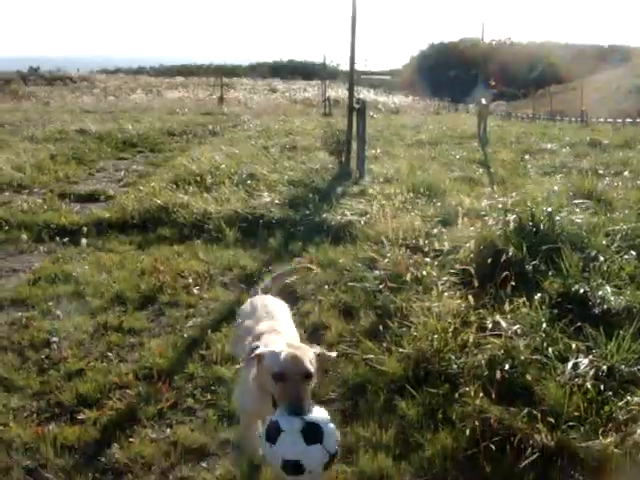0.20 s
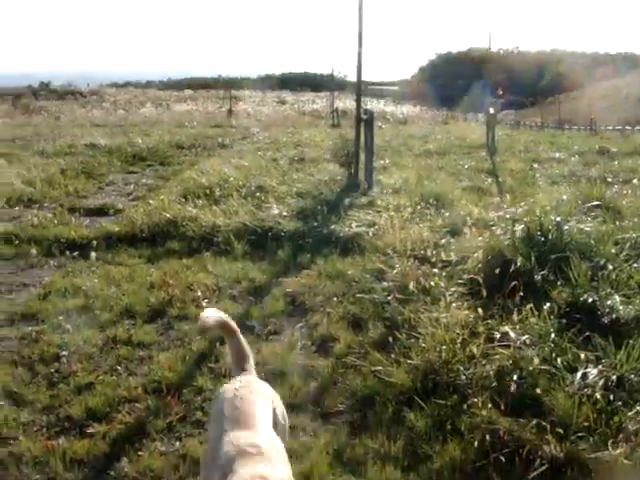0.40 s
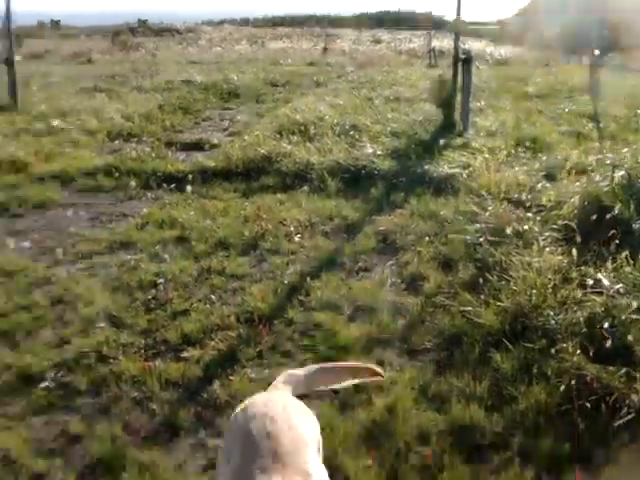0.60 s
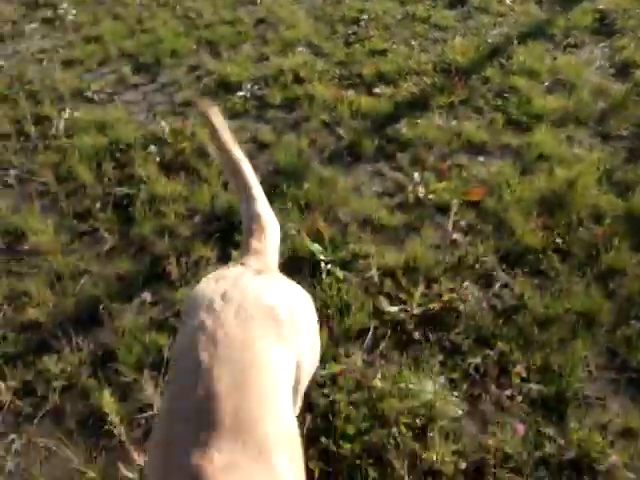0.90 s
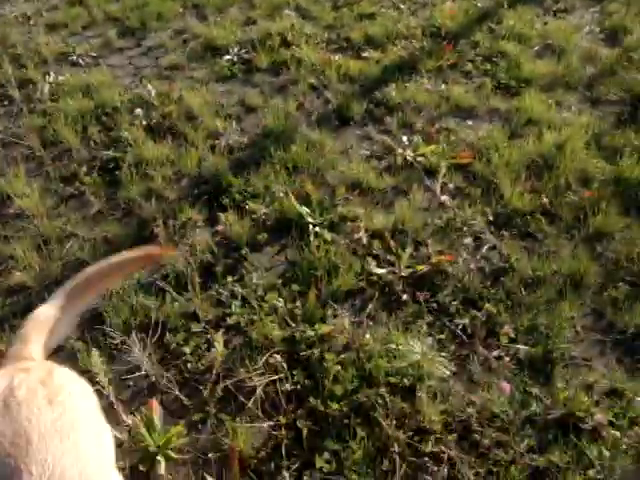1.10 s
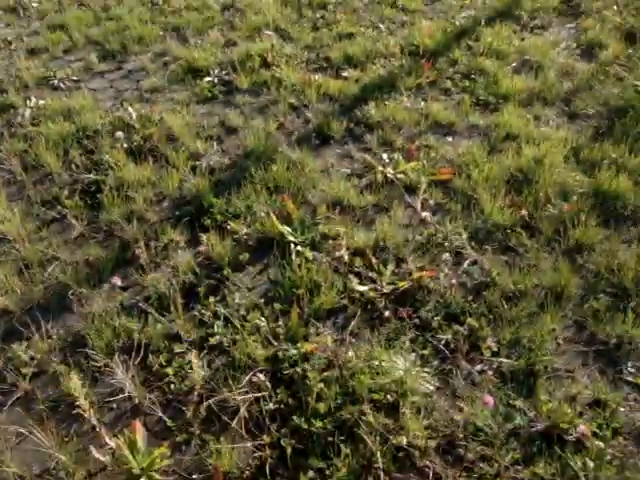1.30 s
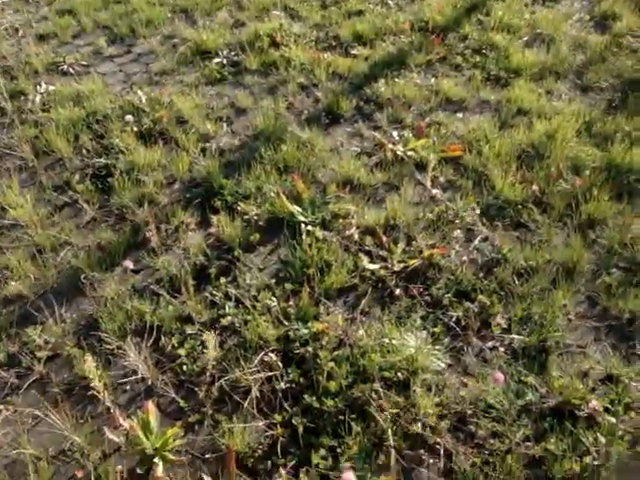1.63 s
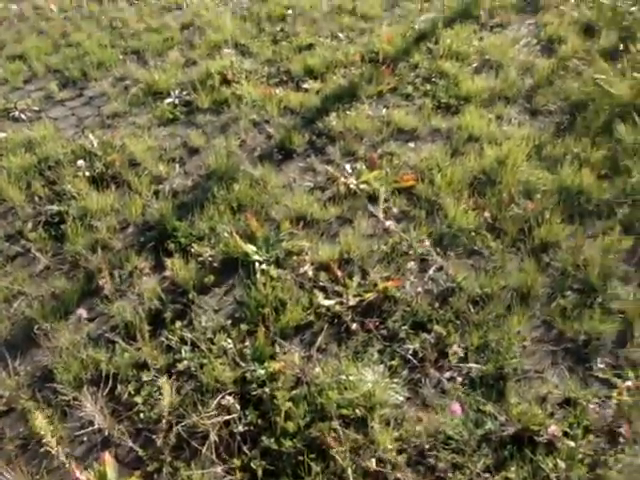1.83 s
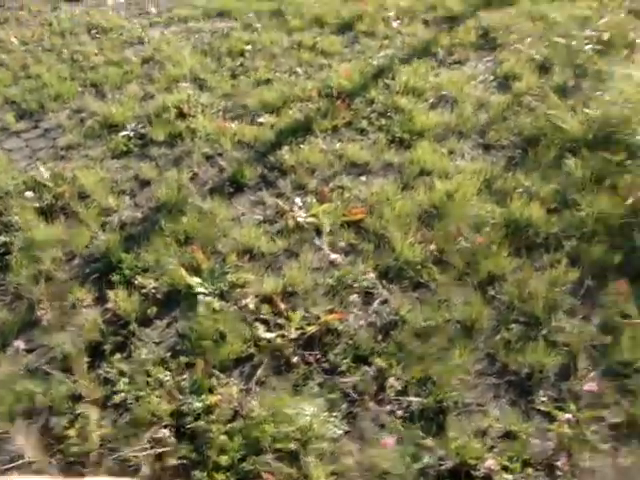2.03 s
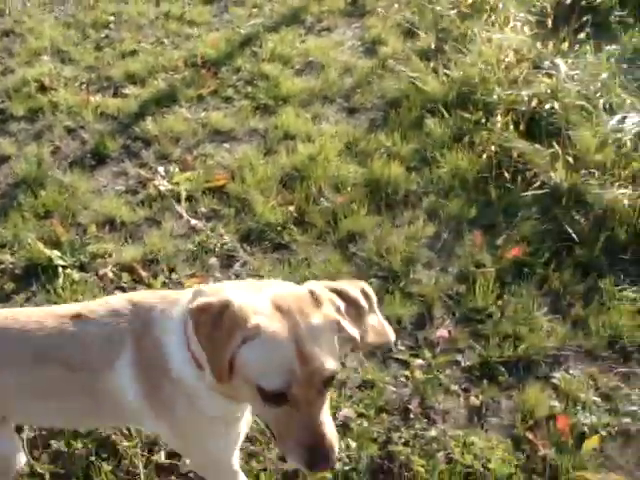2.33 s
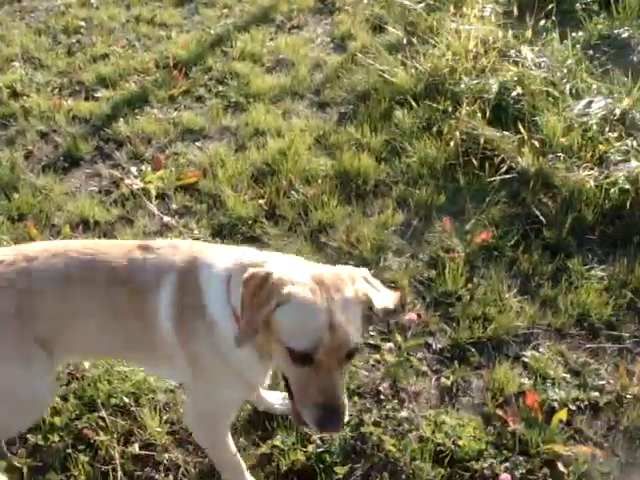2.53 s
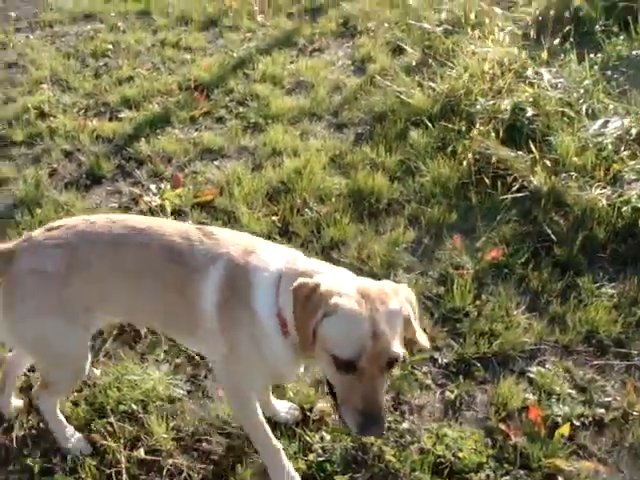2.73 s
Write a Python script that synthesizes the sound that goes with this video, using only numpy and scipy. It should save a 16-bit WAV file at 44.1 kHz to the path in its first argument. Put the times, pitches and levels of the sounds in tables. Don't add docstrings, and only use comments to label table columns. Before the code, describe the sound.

A dog trots up panting, quick breaths out and in growing louder, with a loud snort, gasps and breath gusts buffeting the very close handheld microphone, then easing; soft breeze and crackling grass outdoors.

```python
import sys
import numpy as np
from scipy import signal
from scipy.fft import rfft, irfft
from scipy.io import wavfile
from scipy.ndimage import uniform_filter1d

SR = 44100
rng = np.random.default_rng(int(sys.argv[2]) if len(sys.argv) > 2 else 0)


def unload_audio(sound):
    columns = np.transpose(np.atleast_2d(sound))
    steps = np.round(np.clip(columns, -1, 1) * 32767)
    wavfile.write(sys.argv[1], SR, steps.astype(np.int16))


def boost_factor(decibels):
    exponent = np.asarray(decibels, float) / 20
    return 10 ** exponent


N = 125685


def evened(x):
    return x / np.sqrt(np.mean(x ** 2) + 1e-20)


def add(mix, s, sound):
    at = round(s * SR)
    part = mix[max(at, 0):][:len(sound) + min(at, 0)]
    part += sound[max(-at, 0):][:len(part)]


def coloured(size, points):
    f, db = np.transpose(points)
    hz = np.fft.rfftfreq(size, 1 / SR) + 1
    gain = boost_factor(np.interp(np.log(hz), np.log(f), db, -80, -80))
    return evened(irfft(rfft(rng.standard_normal(size)) * gain, size))


def slow(size, top_hz):
    hz = np.fft.rfftfreq(size, 1 / SR)
    gain = (hz > 0) / (1 + (hz / top_hz) ** 4)
    return evened(irfft(rfft(rng.standard_normal(size)) * gain, size))


def resonate(x, hz, width):
    turn = np.exp(2j * np.pi * np.cumsum(hz) / SR)
    r = np.exp(-np.pi * width * 1.5 / SR)
    return 2 * (turn * signal.lfilter([(1 - r) ** 2], [1, -2 * r, r * r], x / turn)).real


def swell(t, length, rise_s, fall_s):
    return np.sin(np.pi / 2 * np.clip(np.minimum(t / rise_s, (length - t) / fall_s), 0, 1)) ** 2


def swing(s, db, hz, half_s, phase):
    t = np.arange(-.02, .02, 1 / SR)
    return s - .02, boost_factor(db) * np.exp(-(t / half_s) ** 2) * np.cos(2 * np.pi * hz * t + phase)


# start_s, length_s, effort_db, tract_pitch_factor, mouth_brightness_db
BREATHS_OUT = [
    (0.178, 0.19, -30.5, 0.98, 0),
    (0.611, 0.19, -25, 0.96, 1.5),
    (1.578, 0.19, -22.5, 0.96, -5),
    (2.828, 0.09, -32, 1, 4.5),
]
# start_s, length_s, effort_db, tract_pitch_factor, mouth_brightness_db
FORCED_BREATHS = [
    (1.044, 0.15, -21, 0.99, -1.5),
    (1.972, 0.17, -27.5, .94, 0),
    (2.365, 0.13, -27, 0.99, 7.5),
]
# start_s, length_s, effort_db, tract_pitch_factor, mouth_brightness_db
GASPS = [
    (1.365, 0.12, -22, 0.992, -2),
    (.848, 0.072, -27.5, 1.094, 1.5),
]
# start_s, length_s, effort_db, tract_pitch_factor, mouth_brightness_db
BREATHS_IN = [(-.02, 0.16, -37.5, 1.09, 8.5), (0.371, 0.14, -28.5, 1.08, 2),
              (0.469, 0.14, -35.5, 0.97, 10.5), (0.807, 0.069, -24, 1.2, -0.5),
              (0.94, 0.1, -24, 0.94, -6.5), (1.242, 0.17, -23, 1, -6.5), (1.476, 0.09, -33, 0.89, 6.5),
              (1.756, 0.088, -22.5, 0.88, -17), (1.849, 0.099, -22.5, 0.93, -15),
              (2.169, 0.045, -28, 1.17, 3.5), (2.24, 0.053, -41, 0.66, 1), (2.464, 0.063, -31.5, 1.2, 6),
              (2.545, 0.064, -30.5, 1.33, 7.5), (2.674, 0.13, -38.5, 1.34, 1.5)]
# band_hz, width_hz, level_db
OUT_TRACT = [(564, 93, -2.5), (1026, 196, -2), (1445, 118, -7), (1945, 67, -5), (2454, 39, -8.5),
             (2943, 440, -13), (3593, 46, -9), (4370, 50, -57), (6320, 160, -21.5)]
# band_hz, width_hz, level_db
NEAR_TRACT = [(650, 103, -5.5), (1027, 120, 0), (1372, 93, -6), (1693, 91, -8), (2107, 110, -9.5),
              (2794, 180, -8), (3620, 39, -7), (4110, 200, -14.5), (6470, 170, -23)]
# band_hz, width_hz, level_db
AWAY_TRACT = [(530, 85, -10), (990, 210, 0.5), (1300, 120, -1), (1650, 220, -10), (2070, 200, -12.5),
              (2700, 340, -10), (3110, 170, -10), (4800, 300, -24), (6270, 280, -21)]
# band_hz, width_hz, level_db
IN_TRACT = [(615, 143, 6.5), (974, 170, 5), (1233, 56, 2.5), (1780, 120, -12), (2320, 400, -3.5),
            (3110, 296, -5), (3760, 470, -11), (4870, 300, -18.5), (6050, 140, -14), (7000, 150, -16)]
# band_hz, width_hz, level_db
GASP_PINCH = (3270, 520, 0)


def panting():
    out = np.zeros(N)
    for s, *row in BREATHS_OUT:
        add(out, s, breath(*row, OUT_TRACT, rise_s=0.019, fall_s=0.12, sag_db=1.5))
    for (s, *row), tract in zip(FORCED_BREATHS, (NEAR_TRACT, OUT_TRACT, AWAY_TRACT)):
        add(out, s, breath(*row, tract, rise_s=0.013, fall_s=0.039, sag_db=1.5))
    for s, *row in GASPS:
        add(out, s, breath(*row, [*IN_TRACT, GASP_PINCH], rise_s=0.015, fall_s=0.034, sag_db=6.8))
    for s, *row in BREATHS_IN:
        add(out, s, breath(*row, IN_TRACT, rise_s=0.028, fall_s=0.03, sag_db=-7))
    return out


# frequency_hz, level_db (per Hz)
TEETH_HISS = [(290, -59), (500, -1), (696, -22), (922, 0.5), (1750, -5.5), (3050, -7), (9480, -14),
              (10500, -25.5), (13600, -50)]
HISS_DB, MOUTH_HZ = -6.5, 1600
FLUTTER_HZ, FLUTTER_DB, OWN_FLUTTER_DB = 73, 1.5, 1.7
SPITTLE_PER_S, SPITTLE_DB = 150, 19


def breath(length, effort_db, factor, bright_db, tract, rise_s, fall_s, sag_db):
    size = 10000
    t = np.arange(size) / SR
    spittle = rng.random(size) < SPITTLE_PER_S / SR
    air = rng.standard_normal(size) * (1 + boost_factor(SPITTLE_DB) * spittle)
    wander = 1 + 0.025 * slow(size, 14.5)
    throat, mouth = np.zeros(size), np.zeros(size)
    for k, (hz, width, db) in enumerate(tract):
        in_mouth = hz > MOUTH_HZ
        pitch = hz * wander * (1 if in_mouth else factor)
        flutter = boost_factor(db + OWN_FLUTTER_DB * slow(size, 30))
        ring = (-1) ** k * flutter * resonate(air, pitch, width)
        if in_mouth:
            mouth += ring
        else:
            throat += ring
    hiss = boost_factor(HISS_DB + 3.35 * slow(size, 86)) * coloured(size, TEETH_HISS)
    voiced = (throat + boost_factor(bright_db) * mouth) / np.std(throat)
    sound = voiced * boost_factor(FLUTTER_DB * slow(size, FLUTTER_HZ)) + boost_factor(bright_db) * hiss
    return sound * swell(t, length, rise_s, fall_s) * boost_factor(effort_db + sag_db * t / length)


# start_s, length_s, level_db, first_hz, last_hz
AIR_JETS = [(.19, .14, -37, 702, 576), (1.99, 0.15, -36.5, 1335, 1386), (.545, 0.041, -35.5, 3100, 3400),
            (0.854, 0.061, -31, 2210, 2080), (0.962, 0.043, -39, 3000, 3450),
            (1.114, 0.057, -30, 3630, 3620), (1.175, .02, -30, 3600, 3600),
            (1.276, 0.14, -36.5, 2850, 2780), (1.288, 0.097, -38, 2390, 2350),
            (1.405, 0.078, -23, 3470, 3040), (1.395, 0.084, -30, 950, 910), (1.6, .11, -33, 1510, 1490),
            (1.799, 0.118, -41.5, 2950, 2700), (2.033, 0.09, -37, 2250, 3200),
            (1.3, 0.074, -29, 1150, 1200), (2.555, 0.053, -33, 1240, 1150),
            (2.555, 0.053, -41, 2750, 2940), (2.787, 0.024, -47, 4300, 4300)]
JET_Q, JET_EDGE_S, JET_LUMPS_DB = 16, .012, 3


def jets():
    out, size = np.zeros(N), 8000
    t = np.arange(size) / SR
    for s, length, db, first_hz, last_hz in AIR_JETS:
        hz = first_hz + (last_hz - first_hz) * np.minimum(t / length, 1)
        edge_s = min(JET_EDGE_S, length / 2)
        whistle = evened(resonate(rng.standard_normal(size), hz, first_hz / JET_Q))
        lumps = boost_factor(db + JET_LUMPS_DB * slow(size, 60))
        add(out, s, lumps * swell(t, length, edge_s, edge_s) * whistle)
    return out


# time_s, level_db, pitch_hz
NOSTRIL = [
    (1.25, -61, 7230),
    (1.269, -36.5, 7340),
    (1.421, -34.5, 6070),
    (1.46, -27.5, 6200),
    (1.48, -66, 6000),
]


def nostril_hiss():
    t = np.arange(N) / SR
    s, db, hz = np.transpose(NOSTRIL)
    air = rng.standard_normal(N)
    broken_db = 4.0 * evened(uniform_filter1d(air, size=250))
    return evened(resonate(air, np.interp(t, s, hz), 880)) * boost_factor(np.interp(t, s, db) + broken_db)


# centre_s, peak_db, pitch_hz, length_s
PALATE_SNAPS = [(.024, -24, 2780, .001), (.058, -25, 3100, .001), (0.079, -23, 3200, 0.0012),
                (.44, -17, 1140, 0.0046), (0.627, -11.5, 1040, 0.0016), (0.654, -13, 1053, 0.0043),
                (0.674, -16, 1110, 0.0052), (0.870, -12, 1130, 0.0031), (0.883, -9.5, 1140, 0.0026),
                (0.885, -5.5, 756, 0.0012), (2.243, -21, 1296, 0.00095), (.423, -25, 674, 0.0017),
                (.455, -19, 1060, 0.0028), (.473, -27, 330, 0.0034), (.49, -21.5, 584, 0.0035),
                (.858, -16.5, 2400, 0.0016), (1.399, -5, 900, 0.00058), (1.412, -14.5, 3420, .002),
                (1.429, -8, 900, 0.0017), (1.465, -11.5, 3530, 0.0011), (2.596, -25, 1150, 0.0041)]
# centre_s, peak_db, pitch_hz, length_s
LOUD_CATCH = (.836, -6.5, 1080, .0028)


def palate_catches():
    out = np.zeros(N)
    for s, db, hz, half_s in [*PALATE_SNAPS, LOUD_CATCH]:
        add(out, *swing(s, db, hz, half_s, 0))
        add(out, *swing(s, db - 14.5, 2.64 * hz, half_s / 2, 0))
    return out


# start_s, level_db
TONGUE = [
    (1.865, -12.5),
    (3.9, -22),
    (1.1, -22),
]


def tongue_clicks():
    out, t = np.zeros(N), np.arange(200) / SR
    for s, db in TONGUE:
        add(out, s, boost_factor(db) * rng.standard_normal(200) * np.exp(-t / 0.00035))
    return out


# start_s, length_s, level_db, eddy_pitch_hz
PORT_GUSTS = [(0.327, 0.14, -38, 132), (0.908, 0.016, -24, 180), (0.943, 0.032, -13, 242),
              (0.976, 0.029, -20.5, 222), (1.008, 0.04, -22.5, 214), (1.051, 0.023, -21, 188),
              (1.099, 0.027, -16, 184), (1.126, 0.0423, -12.5, 272), (1.167, 0.033, -17, 239),
              (1.205, 0.032, -18.5, 242), (1.235, 0.042, -13.5, 215), (1.271, 0.08, -19.5, 229),
              (1.335, 0.028, -15, 187), (1.381, 0.13, -31, 155), (1.502, 0.077, -25.5, 204),
              (1.641, 0.053, -18.5, 242), (1.696, 0.021, -24, 250), (1.718, 0.019, -16.5, 185),
              (1.745, 0.04, -14, 347), (1.783, 0.053, -15, 348), (1.835, 0.05, -13, 320),
              (1.883, 0.053, -17, 209), (1.931, 0.046, -18.5, 262), (1.978, 0.029, -15.5, 200),
              (2.007, 0.029, -23.5, 217), (2.13, 0.053, -31.5, 129), (2.29, 0.03, -35, 161)]
# centre_s, peak_db, pitch_hz, length_s
DIAPHRAGM_JOLTS = [(.953, -7, 173, 0.0027), (.977, -13.5, 249, 0.0036), (1.246, -3.5, 243, 0.0033),
                   (1.267, -10.5, 200, 0.00253), (1.296, -5, 233, 0.0015), (1.346, -13.5, 160, 0.0028),
                   (1.3535, -3.5, 174, 0.0034), (1.54, -10, 330, .001), (1.672, -6, 332, .001),
                   (1.7, -8, 330, 0.00088), (1.799, -5, 298, .0015), (1.913, -6, 232, 0.0018)]
SUCTION, JOLT_HUSH_S, PORT_LOW_HZ, PORT_HIGH_HZ = 1, 0.0038, 89.6, 1400


def buffet():
    out, t = np.zeros(N), np.arange(N) / SR
    for s, *row in PORT_GUSTS:
        add(out, s, gust(*row))
    leak = signal.butter(N=4, Wn=PORT_LOW_HZ, btype="high", fs=SR)
    out = signal.lfilter(*leak, out - SUCTION * out ** 2)
    for s, *_ in DIAPHRAGM_JOLTS:
        out = out * (1 - np.exp(-((t - s) / JOLT_HUSH_S) ** 2))
    for row in DIAPHRAGM_JOLTS:
        add(out, *swing(*row, np.pi))
    port = signal.butter(N=2, Wn=[PORT_LOW_HZ / 2, PORT_HIGH_HZ], btype="band", fs=SR, output="sos")
    return signal.sosfiltfilt(port, out)


GUST_EDGE_S, EDDY_Q, EDDY_DRIFT, EDDY_LUMPS_DB, SWIRL_DB = 0.0069, 2.3, 0.11, 2.5, -14


def gust(length, db, hz):
    size = 10000
    t, air = np.arange(size) / SR, rng.standard_normal(size)
    pitch = hz * (1 + EDDY_DRIFT * slow(size, 19.6))
    eddies = resonate(air, pitch, hz / EDDY_Q)
    power = abs(uniform_filter1d(eddies ** 2, size=500))
    eddies = eddies / np.sqrt(power + 0.12 * np.var(eddies))
    swirls = evened(resonate(air, 2.5 * pitch, 333))
    lumps = boost_factor(EDDY_LUMPS_DB * slow(size, 42) - 3 * t / length)
    sound = swell(t, length, GUST_EDGE_S, GUST_EDGE_S) * lumps * (eddies + boost_factor(SWIRL_DB) * swirls)
    return boost_factor(db) * evened(sound[t < length])


# time_s, level_db
GRASS_NEARNESS = [(0.0, -87), (0.15, -43.5), (0.25, -49), (0.58, -42.5), (0.68, -42.5), (0.82, -45.5),
                  (1.13, -38), (1.25, -42.5), (1.31, -41.5), (1.4, -61), (1.49, -35), (1.63, -54.5),
                  (1.88, -38), (2.09, -38.5), (2.5, -41.5), (2.7, -41.5), (2.85, -46.5)]
# frequency_hz, level_db (per Hz)
GRASS_COLOUR = [(180, -46), (300, -2), (972, -3), (1110, -0.5), (1680, -4.5), (2710, -6), (9180, -9),
                (10000, -9.5), (10500, -69), (13600, -73), (22000, -120)]


def grass():
    t = np.arange(N) / SR
    level_db = 3.5 + np.interp(t, *np.transpose(GRASS_NEARNESS))
    crackle_db = 1.0 * slow(N, 32) + 2.36 * slow(N, 200)
    return coloured(N, GRASS_COLOUR) * boost_factor(level_db + crackle_db)


# time_s, level_db
WIND_STRENGTH = [(0.0, -46.5), (0.41, -39), (0.81, -51), (0.86, -35.5), (1.2, -40.5), (1.59, -26),
                 (1.63, -37), (1.71, -35.5), (1.92, -30.5), (2.68, -51), (2.81, -38), (2.85, -61)]
# frequency_hz, level_db (per Hz)
WIND_COLOUR = [(12, -24.5), (20, -6.5), (113, -2), (211, -11.5), (248, -10.5), (400, -20.5), (520, -34),
               (880, -120)]


def wind():
    t = np.arange(N) / SR
    level_db = 1.5 + np.interp(t, *np.transpose(WIND_STRENGTH))
    return coloured(N, WIND_COLOUR) * boost_factor(level_db + 0.49 * slow(N, 6.4))


def scene():
    dog = panting() + jets() + nostril_hiss() + palate_catches() + tongue_clicks()
    return (dog + buffet() + grass() + wind())[None]


def roll_off(x):
    return signal.sosfilt(signal.butter(12, 11320, fs=SR, output="sos"), x)


# start_s, length_s
TREBLE_DROPOUTS = [(0.458, 0.02), (0.793, 0.029), (0.937, 0.012), (1.19, 0.015), (1.237, 0.01),
                   (1.747, 0.0095), (1.844, 0.018), (1.867, 0.017)]
DROPOUT_HZ, DROPOUT_SHARE, EDGE_HZ = 5130, 0.91, 10150


def record(dry):
    t = np.arange(N) / SR
    soft = 0.88 * np.tanh(dry / 1.122)
    dropped = sum(1. * (t > s) * (t < s + length) for s, length in TREBLE_DROPOUTS)
    dropped = np.minimum(uniform_filter1d(dropped, size=150), 1)
    high = signal.butter(N=6, Wn=DROPOUT_HZ, btype="high", fs=SR, output="sos")
    thinned = soft - DROPOUT_SHARE * dropped * signal.sosfiltfilt(high, soft)
    edge = signal.firwin(511, EDGE_HZ, window=("kaiser", 9), fs=SR)
    return roll_off(signal.oaconvolve(thinned, edge[None], "same"))


dry = scene()
out = record(dry)
unload_audio(out)
```